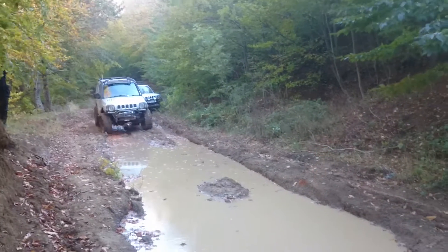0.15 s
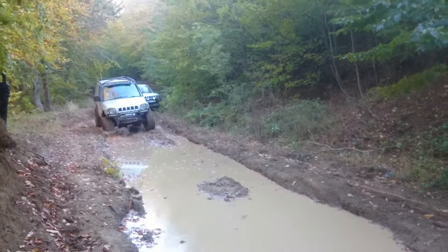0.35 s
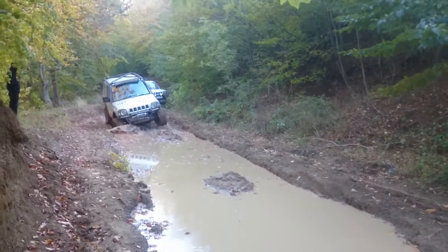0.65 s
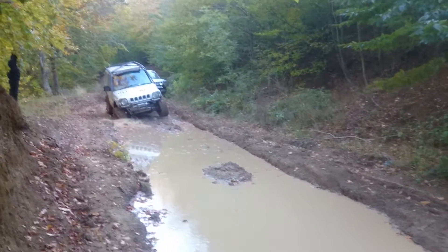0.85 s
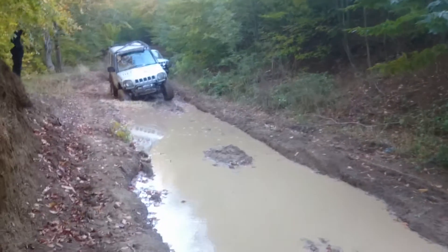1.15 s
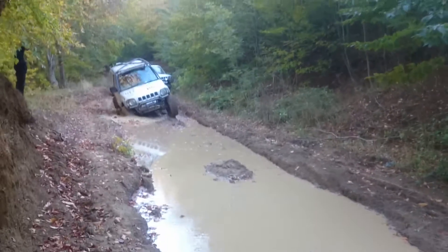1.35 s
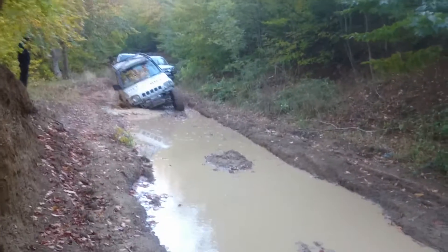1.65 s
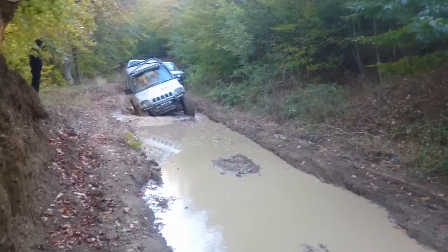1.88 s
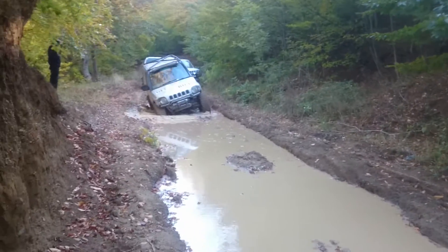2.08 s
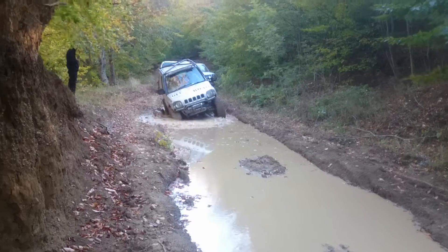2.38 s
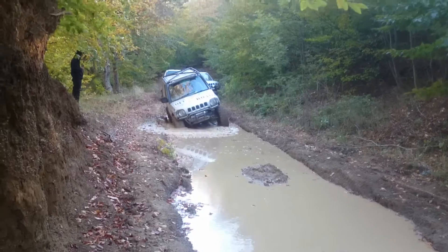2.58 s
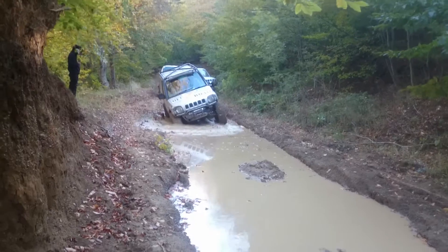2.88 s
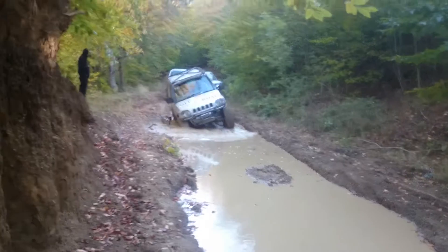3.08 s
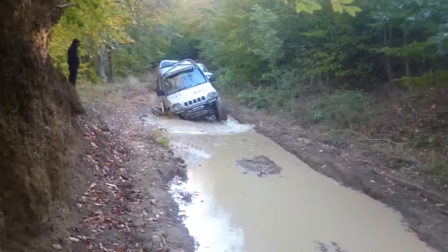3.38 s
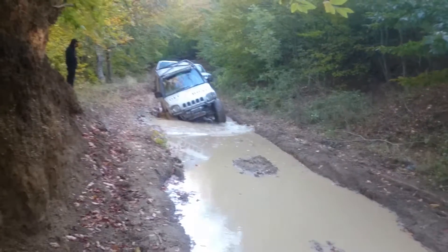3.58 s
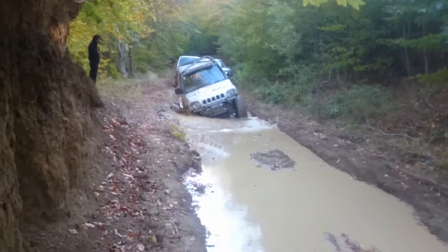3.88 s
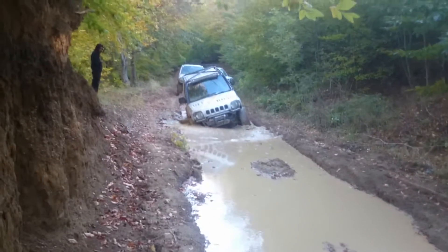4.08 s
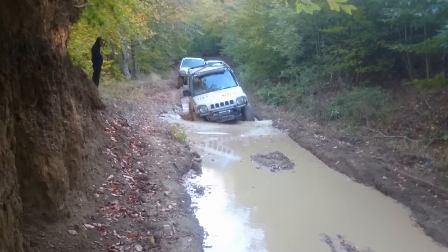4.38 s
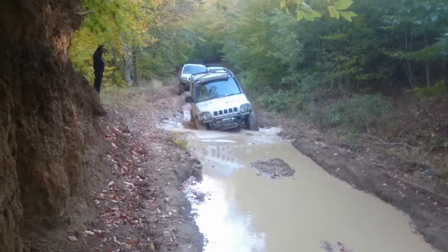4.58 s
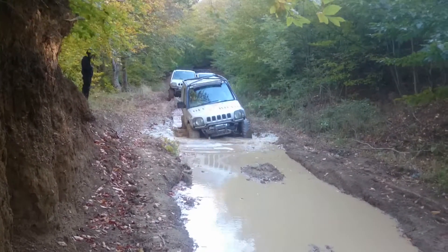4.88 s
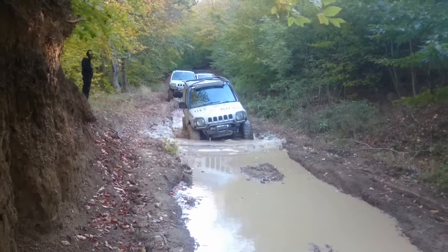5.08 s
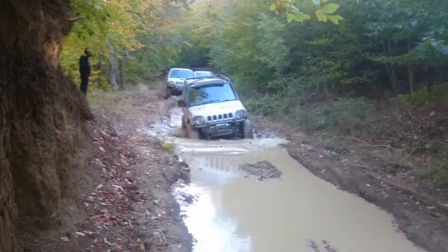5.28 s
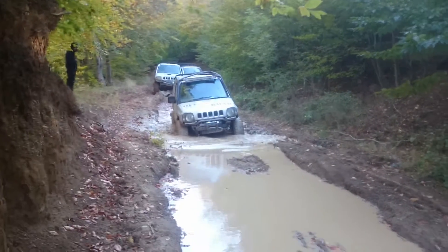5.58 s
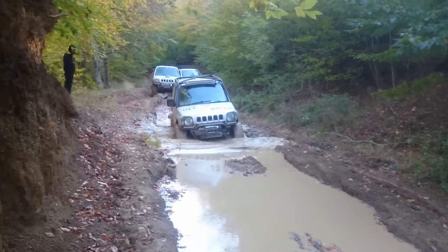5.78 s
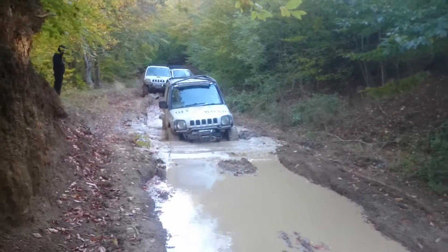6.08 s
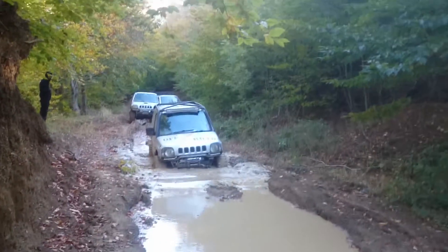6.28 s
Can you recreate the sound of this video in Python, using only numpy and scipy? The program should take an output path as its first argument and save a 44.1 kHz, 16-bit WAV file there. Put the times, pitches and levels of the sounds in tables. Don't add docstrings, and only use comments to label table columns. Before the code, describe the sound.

On a forest track, a small four-wheel-drive's low exhaust hum sags as heavy, dull water slaps hit about half a second in. A short throttle blip follows, the engine drops nearly to a lumpy idle, then revs again and holds a steady drone. Tyres churn water continuously with gulps, droplets and spray. Light wind bumps the two phone microphones, the right one nearer and brighter.

```python
import sys
import numpy as np
from scipy import signal
from scipy.io import wavfile

SR = 44100
rng = np.random.default_rng(int(sys.argv[2]) if len(sys.argv) > 2 else 0)


def persist_wave(psi):
    counts = np.round(np.clip(psi, -1, 1) * 32767).astype(np.int16)
    wavfile.write(sys.argv[1], SR, np.atleast_2d(counts).T)


def boost_factor(decibels):
    exponent = np.asarray(decibels, float) / 20
    return 10 ** exponent


N = 284445
SLOW = 40

# (time [s], splash level [dB], fineness of the drops [0-1])
CHURN = [(0, -44.5, 0.7), (.21, -45, 0), (.5, -45.5, 1), (1.0, -40.5, 0.9), (1.3, -41, 0.64),
         (1.7, -38.5, 0.8), (1.98, -42.5, 0.47), (2.17, -40.5, 0), (2.44, -40.5, .3), (2.47, -45, 0.1),
         (2.9, -43, .2), (3.65, -43.5, 0.12), (4.2, -42, 0), (5.05, -42.5, 0.28), (5.4, -41.5, 0.24),
         (5.82, -38, .4), (6.02, -40.5, 0.38), (6.45, -39, .4)]


def clock():
    return np.arange(N) / SR


def rms_one(x):
    return x / np.sqrt(np.mean(x ** 2) + 1e-20)


def in_time(rows):
    s, *columns = np.transpose(rows)
    return [np.interp(clock(), s, column) for column in columns]


def at_hz(points, hz):
    point_hz, values = np.array(points).T
    return np.interp(np.log(hz), np.log(point_hz), values)


def band_pass(order, low_hz, high_hz, x):
    return signal.sosfilt(signal.butter(order, [low_hz, high_hz], "band", fs=SR, output="sos"), x)


def high_pass(order, hz, x):
    return signal.sosfilt(signal.butter(order, hz, "high", fs=SR, output="sos"), x)


def drift(rate_hz):
    r = np.exp(-2 * np.pi * rate_hz * SLOW / SR)
    settle = 2000
    noise = rng.standard_normal(N // SLOW + 2 + settle)
    return rms_one(signal.lfilter([1], [1, -2 * r, r * r], noise)[settle:])


def fill(slow):
    return np.interp(np.arange(N) / SLOW, np.arange(len(slow)), slow)


def level(db):
    return fill(boost_factor(np.append(db[::SLOW], db[-1])))


def swells(rows, floor_db):
    power = sum(boost_factor(2 * db) * np.exp(-((clock() - s) / half_s) ** 2) for s, db, half_s in rows)
    return 10 * np.log10(power + boost_factor(2 * floor_db))


def later(x, count):
    return np.concatenate([np.zeros(x.shape[:-1] + (count,)), x[..., :-count]], axis=-1)


def ring(clicks, hz, t60):
    r, w = boost_factor(-60 / (t60 * SR)), 2 * np.pi * hz / SR
    return signal.lfilter([0, np.sin(w)], [1, -2 * r * np.cos(w), r * r], clicks + 1e-18)


def banded(source, spectrum, patchy_db):
    # (frequency [Hz], left-right likeness [0-1])
    likeness = [(60, 1), (300, 0.94), (650, 0.97), (1300, 0.29), (2700, 0), (4800, 0.04), (8000, 0.03),
                (15000, 0)]
    out, together = 0, drift(27)
    edges = spectrum[0][0] * 2 ** (np.arange(30) / 3)
    edges = edges[edges < min(spectrum[-1][0] * 1.27, .45 * SR)]
    for k, (low, high) in enumerate(zip(edges, edges[1:])):
        mid, side = band_pass(2, low, high, source[k % 2])
        hz = np.sqrt(low * high)
        alike = np.clip(at_hz(likeness, hz), 0, 1)
        flicker_db = patchy_db * (1.5 * together + drift(9.8))
        gain = fill(boost_factor(at_hz(spectrum, hz) + flicker_db))
        out = out + gain * (np.sqrt(1 + alike) * mid + np.sqrt(1 - alike) * side * [[1], [-1]])
    return rms_one(out)


def wind():
    # (time [s], level [dB], half length [s])
    puffs = [(.03, -38, .05), (.24, -36, 0.042), (.6, -36, 0.037), (1.05, -38, 0.14), (1.55, -32.5, 0.091),
             (1.94, -38.5, 0.077), (2.39, -36, 0.051), (2.8, -39, 0.11), (5.48, -46, 0.066),
             (5.98, -39, 0.055), (6.45, -41, 0.067)]
    wind_db = swells(puffs, -49 - 1.5 * clock())
    lumps = band_pass(3, 42, 80, rng.standard_normal((2, N)))
    return level(wind_db + 7.0) * boost_factor(np.array([[6.0], [-1.5]])) * rms_one(lumps)


def leaves():
    # (time [s], level [dB], half length [s])
    gusts = [
        (5.83, -40.5, 0.13),
        (6.22, -43, .12),
        (6.46, -54, .04),
    ]
    hiss = high_pass(3, 13000, rng.standard_normal((2, N)))
    return level(swells(gusts, -76)) * rms_one(hiss)


def drops():
    # (time [s], peak level [dB], left over right [dB], top against body [dB])
    landings = [(0.0766, -27.5, -6, -18.5), (0.107, -37, -3.0, -14), (0.2345, -27, -1, -23),
                (0.5246, -16.5, 9.5, -18.5), (0.578, -5, 3, -36), (0.614, -25, -2, -28),
                (0.6869, -8, 9, -21), (0.7194, -30, -1.5, -22), (1.4364, -29, -12, -13),
                (1.5804, -42, -4.0, -19), (1.7774, -33, -4.5, -9), (1.785, -31, -8, -10),
                (2.057, -30, -4, -14), (2.1052, -23.5, -3, -20), (2.14, -23.5, -5.0, -19),
                (2.258, -34, -2.0, -9), (2.8995, -38, -5, -7.5), (3.1577, -27, -1, -22),
                (3.2661, -33, -2.0, -11), (3.6509, -30.5, -4, -16), (3.729, -30, -4, -26),
                (3.9165, -27, 4, -22), (4.6917, -40, 3, -21), (5.079, -29, 0, -15), (5.4558, -34, 0, -18),
                (6.089, -29, -5.5, -22), (6.1390, -20, 1, -24), (6.169, -25, 1, -19),
                (6.354, -38, -2.5, -3), (6.438, -21.5, 3, -20)]
    t = np.arange(1300) / SR
    out = np.zeros((2, N + len(t)))
    for s, db, pan_db, top_db in landings:
        fall_s = .003 + .03 * boost_factor(db)
        burst = rng.standard_normal((2, len(t))) * np.exp(-t / fall_s)
        burst[:, 0] = 2.1
        burst = band_pass(2, 2000, 6500, burst) + boost_factor(top_db + 11.5) * high_pass(2, 6500, burst)
        sides_db = np.array([[.5], [-.5]]) * (pan_db + 1.0)
        out[:, round(s * SR):][:, :len(t)] += boost_factor(min(db, -14) - 2.0 + sides_db) * burst
    return out[:, :N]


def gulps():
    # (time [s], peak level [dB], starting pitch [Hz])
    pockets = [(0.526, -10, 446), (0.555, -10, 730), (0.684, -39, 662), (1.503, -14, 381.7),
               (1.719, -33, 447), (1.88, -19, 460), (1.956, -15, 604), (2.075, -20, 640), (2.698, -17, 624),
               (3.65, -23, 388), (3.78, -36, 469), (4.267, -16, 696), (4.314, -16, 644), (4.6, -24, 379),
               (4.885, -24, 513), (5.448, -12, 695), (5.744, -42, 432), (6.053, -17, 682),
               (6.219, -36, 565), (6.356, -16, 492)]
    t = np.arange(2600) / SR
    out = np.zeros(N + len(t))
    for s, db, hz in pockets:
        shape = (1 - np.exp(-t / 0.00078)) * np.exp(-t * hz / 2.0)
        out[round(s * SR):][:len(t)] += boost_factor(db - 10.5) * shape * np.sin(2 * np.pi * hz * t * (1 + 4.8 * t))
    return out[:N]


def spatter(per_s, spread_db, share):
    born = rng.random(N) < per_s / SR
    sizes = rms_one(born * boost_factor(spread_db * np.minimum(rng.exponential(1, N), 5)))
    return rng.standard_normal((2, 2, N)) * (1 + share * sizes)


def bubbles(per_s, cycles):
    sizes = boost_factor(3.9 * np.minimum(rng.exponential(1, N), 4)) * (rng.random(N) < per_s / SR)
    dealt = rng.integers(0, 24, N)
    pitches = np.geomspace(700, 5600, 24)
    return rms_one(sum(ring(sizes * (dealt == k), hz, cycles / hz) for k, hz in enumerate(pitches)))


def slap_db(deep):
    # (time [s], level [dB], rise [s], fall [dB per s], gurgle against the usual [dB])
    slaps = [
        (.225, -40, 0.043, 40, 10.5),
        (.523, -27, .004, 44, -1.5),
        (0.574, -23.5, 0.023, 353, -16),
        (0.683, -23, 0.0026, 85, -17),
        (.7, -37, 0.018, 116, -6),
        (6.3, -57, 0.017, 84, -10),
        (6.43, -36, .02, 62, 0.1),
    ]
    power = 1e-12
    for s, db, rise_s, fall_db, gurgle_db in slaps:
        t = clock() - s
        rise = np.clip(t / rise_s, 0, 1) ** 2
        power = power + rise * boost_factor(2 * (db + deep * gurgle_db - fall_db * np.maximum(t - rise_s, 0)))
    return 10 * np.log10(power)


def layer_db(mix, deep, edge):
    usual_db, wade_s, dry_db = -43, .7, -9
    churn_db, fineness = in_time(CHURN)
    db, share, fine_db, near_db, hit_db = mix
    steady_db = usual_db + share * (churn_db - usual_db)
    steady_db = steady_db + db + fine_db * fineness + near_db * clock()
    steady_db = steady_db + deep * dry_db * np.maximum(1 - clock() / wade_s, 0)
    return 10 * np.log10(boost_factor(2 * steady_db) + boost_factor(2 * (slap_db(edge) + hit_db)))


def upper_share():
    churn_db, fineness = in_time(CHURN)
    heavy = 1 / (1 + boost_factor(2 * (churn_db - slap_db(0))))
    return fineness * (1 - heavy) - 0.13 * heavy


def water():
    # (frequency [Hz], level [dB per Hz])
    slosh_colour = [(330, 2.5), (400, -6), (700, 1), (950, -12), (1100, -8.5)]
    gurgle_colour = [(900, -15), (1150, 1), (1700, 5.5), (2100, 2.5), (2500, -6)]
    splash_colour = [(2100, 0), (2600, 1), (3500, 1), (5000, -0.5), (6500, -18.5), (8000, -22.5)]
    spray_colour = [(5500, -4), (7500, 0), (10500, -3), (12500, -6.5), (15500, -4)]
    # (level against the splash at -43 dB [dB], share of its swing [ratio],
    # gain per unit of fineness [dB], approach [dB per s], level in a slap [dB])
    slosh_mix = (-8.5, 0.38, 2.7, 1.12, -16)
    gurgle_mix = (-5.5, .5, 0, -0.19, -17.5)
    splash_mix = (0.086, 1.01, 0.1, 0.01, 0.11)
    spray_mix = (-14.5, 1.22, 4.5, 0.24, -15.5)
    # (time [s], level [dB], half length [s])
    slops = [
        (1.712, -40, .03),
        (3.655, -38.5, 0.011),
        (3.73, -45, 0.018),
        (5.45, -49, 0.012),
        (6.05, -47, 0.038),
    ]

    slosh_db = layer_db(slosh_mix, deep=0.11, edge=0)
    gurgle_db = layer_db(gurgle_mix, deep=0.99, edge=1)
    splash_db = layer_db(splash_mix, deep=0.24, edge=0.012)
    spray_db = layer_db(spray_mix, deep=0.14, edge=0.14)
    coarse = spatter(300, spread_db=3.5, share=.04)
    fine = spatter(500, spread_db=4.0, share=.09)

    slosh = level(swells(slops, slosh_db) + 1.2) * banded(coarse, slosh_colour, patchy_db=.6)
    gurgle = banded(coarse, gurgle_colour, patchy_db=1.0) + boost_factor(-4) * bubbles(500, cycles=73)
    gurgle = level(gurgle_db + 4.5) * gurgle
    splash = level(splash_db - 2.5) * banded(fine, splash_colour, patchy_db=0.48)
    spray = level(spray_db + 5.5) * banded(fine, spray_colour, patchy_db=0.8)
    middle = gurgle + splash + upper_share() * band_pass(2, 5000, 6600, splash)
    middle = middle - 0.085 * later(middle, round(0.002186 * SR))
    return slosh + middle + spray


def pops():
    # (time [s], peak level [dB])
    firings = [
        (3.299, -18),
        (3.649, -36),
        (3.783, -19),
        (5.454, -18.5),
        (6.44, -30),
    ]
    clicks = np.zeros(N)
    for s, db in firings:
        clicks[round(s * SR)] = boost_factor(db)
    return ring(clicks, 122, 0.13) + boost_factor(3) * ring(clicks, 72, 0.036) + boost_factor(-31) * ring(clicks, 470, 0.045)


def crank():
    # (time [s], crank speed [Hz])
    demand = [(0.0, 51.15), (0.77, 36.81), (1.11, 73.7), (1.3, 57.7), (1.59, 46.8), (1.81, 27.84),
              (2.14, 23.2), (2.28, 78.03), (2.94, 77.64), (3.18, 64.6), (3.38, 66.45), (3.65, 67.8),
              (3.93, 62.5), (5.07, 62.7), (5.23, 68.1), (5.48, 71.26), (6.19, 68.35), (6.45, 62.5)]
    flywheel_s, start_hz = .22, 53.9
    r = np.exp(-1 / (flywheel_s * SR))
    return signal.lfilter([1 - r], [1, -r], in_time(demand)[0], zi=[r * start_hz])[0]


def exhaust_gas(speed_hz, load_db):
    # (frequency [Hz], level [dB per Hz])
    gas_colour = [(45, -65), (70, -21), (130, -6), (220, -14), (290, -7), (330, -49)]
    # (time [s], level [dB], half length [s])
    lurches = [
        (.59, -29, 0.048),
        (2.92, -33, 0.17),
        (3.68, -34.5, 0.13),
        (5.26, -37, 0.059),
    ]
    change = np.abs(np.gradient(speed_hz) * SR)
    burble_db = -46 + 9 * np.log10(1 + change / 6.0) + .2 * load_db
    noise = rng.standard_normal((2, 2, N))
    return level(swells(lurches, burble_db)) * banded(noise, gas_colour, patchy_db=-2.0)


def order_levels(crank_hz, load_db, lope_db, rasp_db):
    # (order [per turn], level at full load [dB], shares of load, lope and rasp swings [ratio])
    orders = [(1, -27, .1, 1.93, 0.01), (2, -15, 0.89, 0.0075, 0.011), (3, -24.5, 0.55, 0.013, 0.13),
              (4, -32.5, 0.36, 0.0087, 1.09)]
    upper_orders_db = [-3.5, -11.5, -13]
    half_orders_db = [-20, 6, 2, -11.5, -15, -25]
    # (frequency [Hz], gain [dB])
    pipe = [(40, 4), (70, -7), (100, -5.5), (125, 1.73), (152, -3.5), (200, -6), (260, -3), (310, -7.5)]
    # (frequency [Hz], gain [dB])
    silencer = [(95, -11.5), (112, -2), (130, 0.5), (290, -1), (345, -19.5), (400, -1.5), (460, -16.5)]
    strong = [(k, db + load * load_db + lope * lope_db + rasp * rasp_db) for k, db, load, lope, rasp in orders]
    uneven_db = -37 + 0.52 * load_db + 0.14 * lope_db
    fourth_db = strong[3][1]
    weak = [(k + 5, fourth_db - 5 + db) for k, db in enumerate(upper_orders_db)]
    weak += [(k + .5, uneven_db + db) for k, db in enumerate(half_orders_db)]
    lines = [(k, db + at_hz(pipe, k * crank_hz)) for k, db in strong]
    lines += [(k, db + at_hz(silencer, k * crank_hz)) for k, db in weak]
    return [(k, db + 0.32 * load_db * (np.abs(np.log2(k * crank_hz / 121)) - .4)) for k, db in lines]


def exhaust_hum(speed_hz, throttle):
    step = 10
    crank_hz, load_db, lope_db, rasp_db = (column[::step] for column in [speed_hz, *throttle])

    def wobble(rate_hz):
        return fill(drift(rate_hz))[::step]

    turn = 2 * np.pi * np.cumsum(crank_hz) * step / SR
    hum, lumps = 0, wobble(9)
    apart = np.pi / 2 * np.clip(1 - (crank_hz - 46) / 12, 0, 1)
    for k, db in order_levels(crank_hz, load_db, lope_db, rasp_db):
        shake_db = .3 * wobble(11)
        shake_angle = .02 * k * wobble(6)
        shake_db = shake_db + (k != 2) * 1.2 * wobble(2.5)
        shake_db = shake_db + .09 * load_db * (lumps + .7 * wobble(5))
        smear = -1.6 * k * k
        hum = hum + boost_factor(db + shake_db) * np.exp(1j * (k * turn + shake_angle + smear + (k % 2 == 1) * apart))
    hum = hum * np.minimum(np.arange(len(turn)) / 40, 1)
    hum = np.imag(hum * np.exp(1j * np.array([[.4], [0]])))
    return np.sqrt(2) * signal.resample_poly(hum, step, 1, axis=1)[:, :N]


def engine():
    # (time [s], load under full [dB], lope of unequal cylinders [dB], rasp of the upper orders [dB])
    foot = [(0, -2, -41, 8.5), (.25, -15.5, -12, 2), (.57, -18, -31, 1.5), (.8, -15.5, -21, 0.5),
            (1.02, 3.5, -1.5, 3), (1.17, -1.9, -1, 8.5), (1.4, -2, 0, 0), (1.6, -6.5, -1, -1),
            (1.68, -20, -12, 5), (2.08, -29, -14, 3), (2.22, -12, -16, 8.5), (2.33, 4.5, -10, -1.5),
            (2.45, -0.5, 3.5, 1), (2.8, -2.7, 2, -3), (3.3, 0.05, 1.8, 0.1), (5.15, -3.5, 1.5, 0),
            (5.8, 0.6, 5, -1), (6.45, -0.9, 5, -4.5)]
    speed_hz, throttle = crank(), in_time(foot)
    return exhaust_hum(speed_hz, throttle) + exhaust_gas(speed_hz, throttle[0])


def scene():
    return wind() + leaves() + drops() + gulps() + water() + pops() + engine()


def band_limit(x):
    return signal.sosfilt(signal.butter(12, 16710, fs=SR, output="sos"), x)


def record(dry):
    port_db = [-4.2, 2.6]
    # (frequency [Hz], width [Hz], gain [dB])
    left_port = [(320, 37, 0), (1050, 140, 7), (1235, 160, -3), (2390, 66, -19), (4640, 680, 15.5),
                 (10650, 1680, 9.5)]
    right_port = [(364, 35, -10), (928, 320, -1.5), (1410, 264, -7.5), (1910, 52, 0), (2270, 130, -6.5),
                  (3440, 59, 6), (4990, 1030, 10), (8400, 2900, -4)]
    out = dry * boost_factor(np.array(port_db))[:, None]
    for k, port in enumerate((left_port, right_port)):
        for hz, width_hz, db in port:
            b, a = signal.iirpeak(hz, hz / width_hz, fs=SR)
            out[k] += (boost_factor(db) - 1) * signal.lfilter(b, a, out[k])
    out[0] = signal.sosfilt(signal.butter(8, 12160, fs=SR, output="sos"), out[0])
    out[1] = later(out[1], 12)
    after = clock() - 2.2286
    out += -.24 * (after > 0) * np.exp(-np.abs(after) / .002) * boost_factor(np.array([[-5.0], [2.5]]))
    out = high_pass(3, 44, out)
    out = signal.sosfilt(signal.ellip(12, .5, 70, 15850, fs=SR, output="sos"), out)
    return band_limit(out)


dry = scene()
out = record(dry)
persist_wave(out)
```